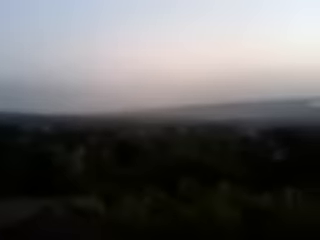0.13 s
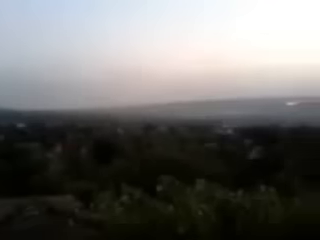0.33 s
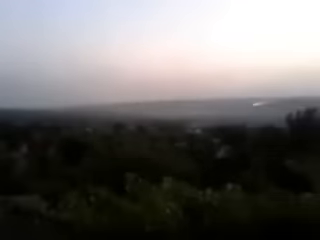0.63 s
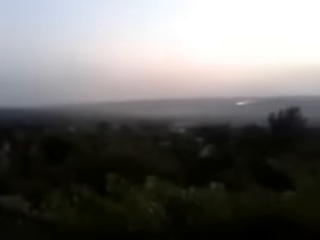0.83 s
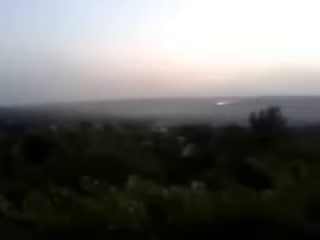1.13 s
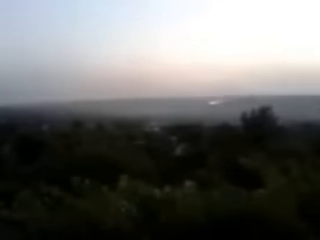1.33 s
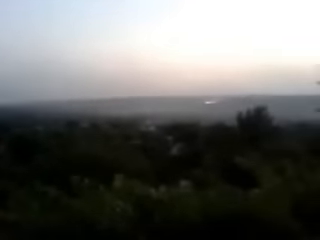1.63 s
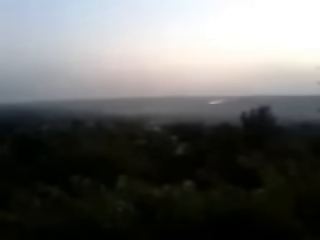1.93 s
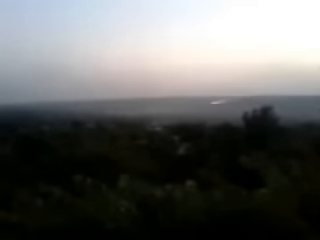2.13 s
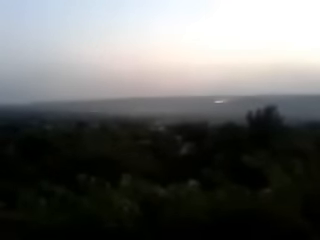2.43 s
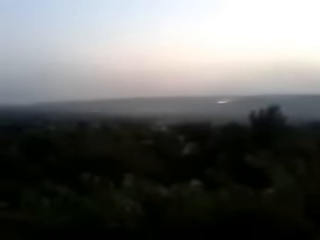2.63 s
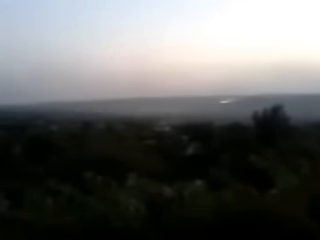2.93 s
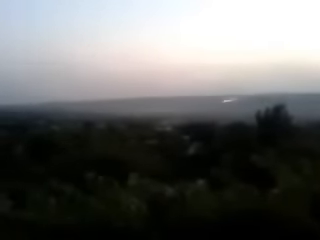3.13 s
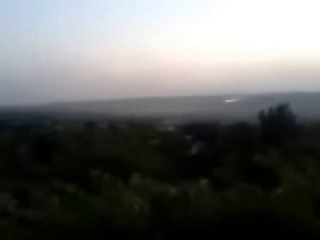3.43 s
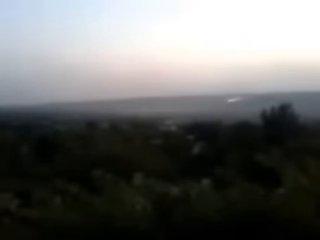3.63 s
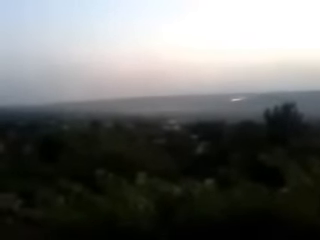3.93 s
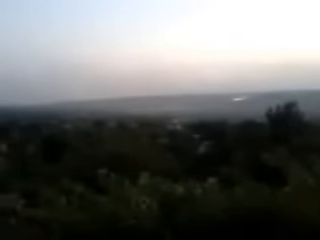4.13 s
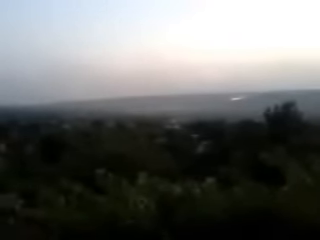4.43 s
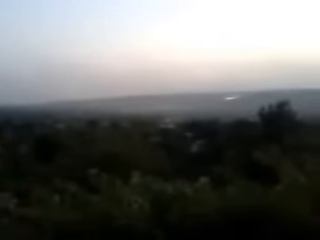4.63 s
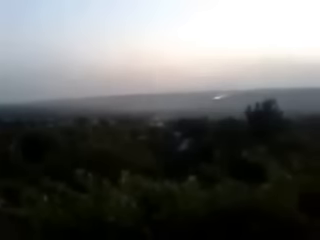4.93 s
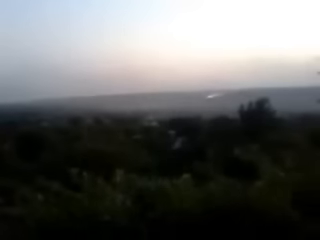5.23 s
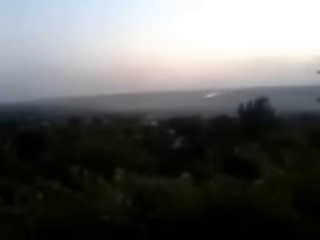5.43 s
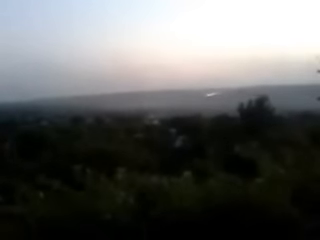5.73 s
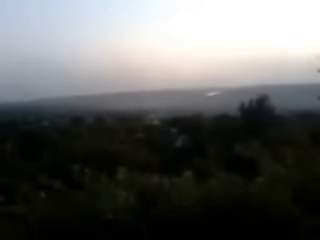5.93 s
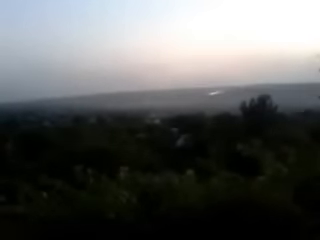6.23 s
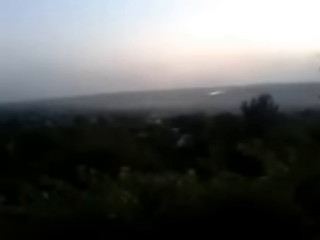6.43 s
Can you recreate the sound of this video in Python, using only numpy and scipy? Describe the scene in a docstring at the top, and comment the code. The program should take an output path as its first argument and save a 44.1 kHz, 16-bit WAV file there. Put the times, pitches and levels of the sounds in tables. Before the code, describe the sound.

Open hillside with artillery firing far off: sudden stuttering explosions overload a cheap narrow-band microphone, chopping the sound into crackling pops. A low rolling roar follows, swelling and sinking with hill echoes and soft bass impacts while gradually dying. A second loud, denser volley of cracks arrives late, breaks up raggedly, and leaves another long rumble over faint hiss.

```python
"""Rocket artillery across a valley: two salvos arrive as trains of shock fronts that flip the air pressure.
They slam a small narrow-band microphone from stop to stop and chop the roar into ragged pops.
A deep boom follows each train, then a grainy roar of filtered shocklets decays under echo swells and lulls.
Short pitched noise bursts give body to some bangs and pops or ring hollow in the roar.
Bass noise surges make the dull thuds of far impacts; a faint hiss lies below."""
import sys
import numpy as np
from scipy import signal
from scipy.fft import rfft, irfft
from scipy.io import wavfile
from scipy.ndimage import uniform_filter1d

SR = 44100
rng = np.random.default_rng(int(sys.argv[2]) if len(sys.argv) > 2 else 0)


def file_out(sig):
    """Save sig as 16-bit WAV at sys.argv[1]."""
    # one column per channel
    cols = np.atleast_2d(sig).T
    # limit, then scale
    lim = np.clip(cols, -1, 1)
    pcm = np.round(lim * 32767).astype(np.int16)
    wavfile.write(sys.argv[1], SR, pcm)


N = 290178  # length [samples]
T = np.arange(N) / SR  # time [s]
BIN_HZ = np.maximum(np.arange(N // 2 + 1) * SR / N, 1)  # spectrum bins, kept off zero


def undb(db):
    """Decibels to gain."""
    return 10 ** (np.asarray(db) / 20)


def unit(x):
    """Scale to rms 1."""
    return x / np.sqrt(np.mean(x ** 2))


def colour(x, points):
    """Shape x with a spectrum of (frequency [Hz], gain [dB]) points, joined along log frequency."""
    hz, db = np.transpose(points)
    gain = undb(np.interp(np.log(BIN_HZ), np.log(hz), db))
    return irfft(rfft(x) * gain, N)


def band(x, lo_hz, hi_hz, order=8):
    """Band-pass with smooth skirts and no phase shift, scaled to rms 1."""
    low_skirt = 1 + (lo_hz / BIN_HZ) ** order
    high_skirt = 1 + (BIN_HZ / hi_hz) ** order
    return unit(irfft(rfft(x) / low_skirt / high_skirt, N))


def walk(rate):
    """Random levels held 1 / rate s and smoothed twice; rms 1."""
    hold = int(SR / rate)
    steps = rng.standard_normal(N)[np.arange(N) // hold]
    return unit(uniform_filter1d(uniform_filter1d(steps, hold), hold))


def steady(x, span_s):
    """Take the slow swells out of a noise and keep its grain."""
    power = uniform_filter1d(x ** 2, int(span_s * SR))
    return x / np.sqrt(power + 1e-9)


def bell(s, width_s):
    """A smooth swell that peaks at 1 at time s."""
    return np.exp(-np.minimum(((T - s) / width_s) ** 2, 50))


def shocklets(rate, spread_db):
    """A dense rain of tiny pressure jumps of either sign, their sizes spread exponentially in dB."""
    size = undb(spread_db * np.minimum(rng.exponential(size=N), 5))
    falls = rng.random(N) < rate / SR  # rate per second
    return unit(falls * size * rng.choice([-1, 1], N))


def hiss():
    """Faint steady noise in the upper band, from the start of the first salvo on."""
    return undb(-61) * band(rng.standard_normal(N), 1500, 5500) * (T > SALVOS[0][0])


def drift(x, rate=14, count=26):
    """Paths over the hills add and cancel, so each fifth of an octave from 80 Hz up swells and fades alone."""
    place = np.clip(5 * np.log2(BIN_HZ / 80), 0, count - 1)
    depths_db = np.linspace(2, 2.5, count)  # from 80 Hz up to about 2.5 kHz
    spectrum = rfft(x)
    drifted = np.zeros(N)
    for k, depth_db in enumerate(depths_db):
        share = np.maximum(1 - np.abs(place - k), 0)
        drifted += irfft(spectrum * share, N) * undb(depth_db * walk(rate))
    return drifted


# tone of the roar before it is split into voices: (frequency [Hz], relative level [dB])
ROAR_COLOUR = [(55, 0.5), (102, 1), (140, -2), (175, -0.5), (235, -5), (300, -3), (420, -6.5), (500, -16.5),
               (600, -15), (710, -20), (850, -17), (1120, -24.5), (1350, -20), (1750, -33.5), (2300, -33.5),
               (2800, -46.5), (3500, -47), (4300, -63)]


def roar():
    """Exhaust shocklets scattered by the hills, split by pitch into (rumble, growl, crackle, fizz)."""
    grains = shocklets(rate=1400, spread_db=1.32) + undb(-2.5) * rng.standard_normal(N)
    air = drift(colour(grains, ROAR_COLOUR))
    flutter = undb(1.8 * walk(rate=40))  # turbulence on the way
    rumble = steady(band(air, 62, 425), span_s=0.073)
    growl = steady(band(air, 439, 1530) * flutter, span_s=0.074)
    crackle = steady(band(air, 1600, 2198, order=16) * flutter, span_s=0.12)
    fizz = band(air, 2430, 5400, order=16) * flutter
    return rumble, growl, crackle, fizz


# how the roar dies away, one row per salvo, for rumble, growl, crackle and fizz in turn:
# (starting level [dB], fall [dB/s])
ROAR_DECAYS = [
    [(-14, 5.5), (-29, 4), (-38, 10.5), (-45.5, 10.5)],
    [(-13, 5.5), (-28, 4.5), (-40.5, 5), (-48, 10.5)],
]
# roar that hangs on in the valley: (rumble [dB], growl [dB], crackle [dB], fizz [dB])
FAR_ROAR_DB = (-29, -40, -54, -75.5)
# echoes off the hills that lift the roar, and lulls (negative lift) between them:
# (time [s], width [s], rumble lift [dB], growl lift [dB], crackle lift [dB], fizz lift [dB])
ECHOES = [(0.695, 0.058, 3.5, 5, 4.5, -1.5), (1.039, 0.044, -1, 2.5, 3, 3.5),
          (1.239, 0.079, 3.5, 2.5, 1.5, 5), (1.35, 0.04, 3.5, 7, 3.5, 10),
          (1.44, 0.033, -3.5, -0.5, 2.5, -3), (1.55, 0.014, -3, 2.5, 0, 13),
          (1.661, 0.038, 0, -1.5, 8.5, 6), (1.8, 0.072, 2.5, -3, -5, 1.5), (2.001, 0.095, 2, 2, -1, 3.5),
          (2.168, 0.041, -2, 6, -6, 6.5), (2.328, 0.033, 0, 4, -2.5, 7.5), (2.481, 0.11, 4, 1.5, -3, 2),
          (2.719, 0.11, 2, 5.5, 5, 6.5), (2.82, 0.036, 0.5, -3, -3, 0), (2.929, 0.048, 0, 3, 5.5, 6),
          (3.03, 0.05, 0, -4.5, 0.5, -9), (3.27, 0.13, 3, 7.5, 5, 4.5), (3.36, 0.11, 2, 3, 1, 3.5),
          (3.59, 0.063, 4, 3.5, 4, -1.5), (3.94, 0.032, 0.5, -4.5, 7, -1), (4.002, 0.36, 2, 7, 2, 12.5),
          (4.66, 0.09, 0, -5, -3, 1), (5.078, 0.024, 1, 3, 4.5, -4), (5.17, 0.047, 3.5, 6, -0.5, 2),
          (5.4, 0.045, 4.5, 3.5, 1.5, 2.5), (5.65, 0.025, 2, -3.5, 0, 5), (5.829, 0.091, 4.5, 6, 4.5, 7),
          (5.96, 0.04, 0.5, 2, 2, 5), (6.2, 0.021, -5.5, 1.5, 3, 2), (6.311, 0.069, 1, 4.5, 4.5, 8.5),
          (6.53, 0.17, 1, 4.5, 9, 13)]


def roar_levels(decays, age):
    """Rumble, growl, crackle and fizz in dB: each falls towards the far roar and swells or lulls with the echoes."""
    bells = np.array([bell(s, width_s) for s, width_s, *_ in ECHOES])
    lifts = np.array(ECHOES)[:, 2:].T @ bells
    levels = []
    for (db, fall), far_db, lift in zip(decays, FAR_ROAR_DB, lifts):
        near_and_far = np.hypot(undb(db - fall * age), undb(far_db))
        levels.append(20 * np.log10(near_and_far) + lift)
    return levels


# far impacts, of which only a dull thud carries: (time [s], width [s], pitch [Hz], level [dB])
THUDS = [(0.46, 0.03, 95, -20), (0.64, 0.034, 99, -9.5), (0.8, 0.045, 120, -20), (1.225, 0.046, 141, -14),
         (1.561, 0.04, 100, -16.5), (1.851, 0.087, 118, -24.5), (2.48, 0.049, 132, -18),
         (2.6, 0.036, 105, -24.5), (3.28, 0.026, 170, -33), (3.531, 0.046, 120, -24),
         (4.04, 0.032, 165, -24), (4.611, 0.045, 105, -12), (5.55, 0.092, 105, -16), (5.7, 0.05, 125, -29),
         (5.89, 0.036, 110, -16), (6.091, 0.055, 120, -23), (6.35, 0.14, 110, -23.5)]


def thuds(half_width=0.53):
    """Far impacts, smeared by the terrain into short surges of bass, each at its own pitch."""
    noise = rng.standard_normal(N)
    total = np.zeros(N)
    for s, width_s, hz, db in THUDS:
        bass = band(noise, hz / (1 + half_width), hz * (1 + half_width))
        total += undb(db) * bell(s, width_s) * steady(bass, span_s=0.042)
    return total


# short pitched bursts of noise: some give body to a bang or pop, others ring hollow in the roar:
# (time [s], width [s], pitch [Hz], level [dB])
PITCHED_BURSTS = [(0.297, 0.0081, 303, -8.5), (0.725, 0.014, 415, -15), (1.34, 0.013, 1260, -25.5),
                  (2.32, 0.07, 320, -22.5), (2.72, 0.05, 890, -36), (3.33, 0.029, 304, -21.5),
                  (3.35, 0.054, 403, -28.5), (4.167, 0.0015, 1210, -3), (4.3142, 0.0017, 1296, -10),
                  (4.3145, 0.0045, 930, -12), (4.515, 0.015, 333, -13), (4.95, 0.015, 1340, -34),
                  (4.985, 0.0094, 1380, -27.5), (5.09, 0.024, 1620, -36), (5.17, 0.027, 483, -24),
                  (5.66, 0.016, 353, -16.5), (5.95, 0.01, 1460, -29)]


def pitched_bursts(half_width=0.16):
    """Short swells of noise in one narrow band, each at its own pitch."""
    noise = rng.standard_normal(N)
    total = np.zeros(N)
    for s, width_s, hz, db in PITCHED_BURSTS:
        tone = band(noise, hz / (1 + half_width), hz * (1 + half_width), order=24)
        total += undb(db) * bell(s, width_s) * steady(tone, span_s=0.032)
    return total


# tone of the pops: (frequency [Hz], relative level [dB])
POP_COLOUR = [(300, 15), (600, 4.5), (1500, 1.5), (2300, 2.5), (3000, -11.5), (4000, -11.5)]
# ragged pops, where the diaphragm hangs between its stops and lets a burst of crackle through:
# (time [s], length [s], pressure meanwhile [full scale, before the train weakens], crackle level [dB])
POPS = [(0.271, 0.0059, -0.25, -28.5), (0.287, 0.024, 0.2, -20.5), (0.323, 0.0031, 0.66, -18),
        (0.339, 0.0056, 0.1, -24), (0.352, 0.0054, 0.45, -20.5), (0.369, 0.01, 0.1, -24),
        (0.389, 0.0069, -0.1, -28), (0.405, 0.0068, 0.45, -25), (0.42, 0.015, 0.3, -27),
        (0.443, 0.007, 0.8, -29), (0.46, 0.0059, 0.6, -37), (0.473, 0.012, 0.2, -35.5),
        (4.2435, 0.0034, -0.3, -30), (4.497, 0.027, 0.6, -30), (4.539, 0.037, 0.24, -36),
        (4.584, 0.0066, 0.3, -35), (4.6, 0.003, 1, -29), (4.619, 0.0051, 0.06, -47)]


def pops(edge_s=0.0017):
    """Bursts of coarse shocklet crackle that switch on and off sharply."""
    grains = shocklets(rate=900, spread_db=-1.5) + undb(-9) * rng.standard_normal(N)
    crackle = steady(band(colour(grains, POP_COLOUR), 250, 4000), span_s=0.011)
    gate = np.zeros(N)
    for s, length_s, _, db in POPS:
        inside = np.minimum(T - s, s + length_s + edge_s - T)
        gate += undb(db) * np.clip(inside / edge_s, 0, 1)
    return crackle * gate


# brief swells of air that pin the diaphragm and choke the roar; a negative one lets it go with a tick:
# (time [s], width [s], pressure [full scale])
SWELLS = [(0.179, 0.0026, 5), (0.228, 0.0035, 1.5), (0.264, 0.002, -0.8), (0.557, 0.0024, 1.5),
          (0.569, 0.0044, 1.4), (0.748, 0.0038, 2), (4.183, 0.0021, 1.8), (4.428, 0.00065, -1.5),
          (4.4615, 0.0007, -1.5), (4.468, 0.00085, -1.7), (4.672, 0.002, -0.5), (4.69, 0.0015, 1.2),
          (4.762, 0.0016, 1.5), (4.809, 0.0043, 2), (4.886, 0.0033, 1.5), (4.92, 0.0017, 0.8),
          (4.97, 0.0032, 2)]


def swells(pressure):
    """Each swell drives the pressure further the way it already leans, or back if negative."""
    total = np.zeros(N)
    for s, width_s, size in SWELLS:
        lean = np.sign(pressure[int(s * SR)])
        total += lean * size * bell(s, width_s)
    return total


# bangs, each the arrival of one shock front; the train's decay and crack trim act on top:
# (time [s], pressure [full scale], rise [ms], relative crack level [dB])
BANGS = [(0.139, 0.42, 1.4, -33), (0.1474, 1.1, 0.25, -1), (0.164, 0.27, 1.2, -9), (0.1684, 0.45, 1.1, -9),
         (0.1896, 1.1, 0.62, -6.5), (0.192, 0.99, 0.6, -13), (0.2046, 0.92, 0.29, -20),
         (0.2153, 1.2, 0.75, -22), (0.2328, 0.52, 1.4, -30), (0.2457, 1.33, 0.42, -11),
         (4.158, 0.15, 1.1, -6), (4.1655, 0.75, 0.26, 0.5), (4.1868, 0.69, 0.32, -1),
         (4.1891, 1.2, 0.21, -7), (4.196, 1, 0.17, -4), (4.203, 0.1, 1.4, -15), (4.2116, 1.4, 0.21, -11),
         (4.2167, 0.79, 0.28, -6.5), (4.2245, 1.1, 0.32, -14), (4.2262, 1.2, 0.5, -16),
         (4.2493, 0.82, 0.46, -14), (4.2598, 0.97, 0.3, -10), (4.278, 0.17, 1.1, -7),
         (4.2845, 0.69, 0.24, -1.5), (4.2911, 1.5, 0.23, -7), (4.2938, 0.81, 0.39, -8),
         (4.302, 0.7, 0.31, -14.5), (4.3116, 0.42, 0.33, -25), (4.313, 0.52, 0.22, -16),
         (4.3274, 0.75, 0.78, -17), (4.345, 1.1, 0.55, -17), (4.3471, 1.2, 0.5, -14),
         (4.353, 0.5, 0.7, -10), (4.3594, 0.73, 0.34, -5.5), (4.3711, 1.6, 0.65, -16),
         (4.3784, 1.7, 0.71, -19), (4.3958, 1.76, 0.68, -21), (4.41, 1.7, 1.6, -32),
         (4.4428, 0.43, 0.85, -18), (4.4832, 0.33, 0.55, -15.5), (4.4896, 1.5, 0.36, -8)]


def salvo_fronts(start, end):
    """Bangs and pop-opening fronts of one salvo in order, as rows of (s, pressure, rise ms, crack dB, hold s)."""
    pop_rise_ms, pop_crack_db = 1.28, -24
    fronts = [(*row, 0) for row in BANGS]
    fronts += [(s, pressure, pop_rise_ms, pop_crack_db, length_s) for s, length_s, pressure, _ in POPS]
    return np.array([row for row in sorted(fronts) if start - .05 < row[0] < end - .05])


def after_shocks(start, count=70):
    """Follow-up fronts at uneven intervals, as rows of (s, pressure, rise ms, crack dB, hold s)."""
    chance = rng.random((count, 4))
    times = start + .0145 * np.cumsum(.35 + 1.2 * chance[:, 0])
    pressure = 0.26 + (chance[:, 1] - .5)
    rise_ms = 0.93 * (.5 + chance[:, 2])
    crack_db = -19 + 9 * (chance[:, 3] - .5)
    return np.column_stack([times, pressure, rise_ms, crack_db, np.zeros(count)])


def shock_train(fronts, limit):
    """Fronts flip the pressure by turns with a crack; after any hold it builds to its limit until the next one."""
    build_s, pop_close_s = 0.0086, 0.0028  # time per unit of pressure, after a bang and after a pop
    crack_s = 0.005  # decay of a crack
    push, crack = np.zeros(N), np.zeros(N)
    for k, (s, behind, rise_ms, crack_db, hold_s) in enumerate(fronts):
        near = slice(int((s - .008) * SR), int((s + .08) * SR))
        age = T[near] - s
        passed = .5 + .5 * np.tanh(age / (rise_ms * 1e-3))
        built = np.maximum(age - hold_s, 0) / (pop_close_s if hold_s else build_s)
        pressure = (-1) ** k * np.minimum(behind + built, limit[near])
        push[near] += passed * (pressure - push[near])
        crack[near] += passed * undb(crack_db) * np.exp(-np.abs(age) / crack_s)
    push[near.stop:] = push[:near.stop][-1]  # the last pressure stays
    grit = band(rng.standard_normal(N), 330, 2900, order=6)
    grit = colour(grit, [(400, 5.5), (800, 8), (1500, -5), (2600, 0), (3800, -5.5)])
    return push + undb(-7.5) * crack * steady(grit, span_s=0.0017)


# salvos: (start [s], end [s], after-shock pressure limit [full scale, before decay], after-shock decay [s],
# extra crackle and fizz [dB], boom level [dB], boom fall [dB/s])
SALVOS = [(0.138, 4.15, 1.3, 0.28, 3.5, -7, 5), (4.155, 6.58, 1.5, 0.37, 4.5, -10.5, 1.5)]


def salvo(voices, decays, start, end, after_pressure, decay_s, extra_db, boom_db, boom_db_per_s):
    """One salvo: a train of shocks that weakens and gives way to a deep boom and the long roar."""
    peak_pressure, ease_s = 2.52, 0.041  # limit during the bangs [full scale], its easing afterwards [s]
    fronts = salvo_fronts(start, end)
    last = fronts[-1, 0]
    age = np.maximum(T - last, 0)
    dying = np.exp(-age / decay_s)
    limit = after_pressure + (peak_pressure - after_pressure) * np.exp(-age / ease_s)
    shocks = dying * shock_train(np.vstack([fronts, after_shocks(last)]), limit)
    boom = steady(band(rng.standard_normal(N), 28, 46, order=4), span_s=0.44)
    boom *= undb(boom_db - boom_db_per_s * age)

    rumble, growl, crackle, fizz = voices
    rumble_db, growl_db, crackle_db, fizz_db = roar_levels(decays, age)
    treble = undb(crackle_db) * crackle + undb(fizz_db) * fizz
    # the crackle comes straight behind the shocks, the lows roll in later
    lows = (1 - dying) * boom + undb(rumble_db - 3.4 * dying) * rumble
    treble_lift_db = extra_db * dying ** 2 + 3 * np.abs(shocks)  # 3 dB per unit of shock pressure
    highs = undb(growl_db + 2 * dying) * growl + undb(treble_lift_db) * treble
    heard = np.clip(np.minimum(T - start, end + .02 - T) / .008, 0, 1)
    return heard * (shocks + lows + highs)


def scene():
    """Air pressure at the microphone: both salvos, pops, far thuds, pitched bursts, swells and hiss."""
    voices = roar()
    salvos = sum(salvo(voices, decays, *row) for decays, row in zip(ROAR_DECAYS, SALVOS))
    pressure = salvos + pops() + thuds() + pitched_bursts()
    return (pressure + swells(pressure) + hiss())[None]


def record(dry):
    """The diaphragm sticks at its stops, a bass cut turns flips into thumps, and the narrow band is hard-limited."""
    travel = 1.13  # the diaphragm's stops [full scale]
    held = travel * np.tanh(dry / travel)
    thumps = signal.sosfilt(signal.butter(4, 91.6, "hp", fs=SR, output="sos"), held)
    dull = signal.sosfilt(signal.butter(4, 3330, fs=SR, output="sos"), thumps)
    narrow = signal.sosfilt(signal.ellip(8, .3, 60, 4020, fs=SR, output="sos"), dull)
    limited = np.clip(undb(1) * narrow, -1, 1)
    # a last low-pass trims the top of the limiter's harmonics
    return signal.sosfilt(signal.ellip(8, .2, 70, 15500, fs=SR, output="sos"), limited)


dry = scene()
out = record(dry)
file_out(out)
```